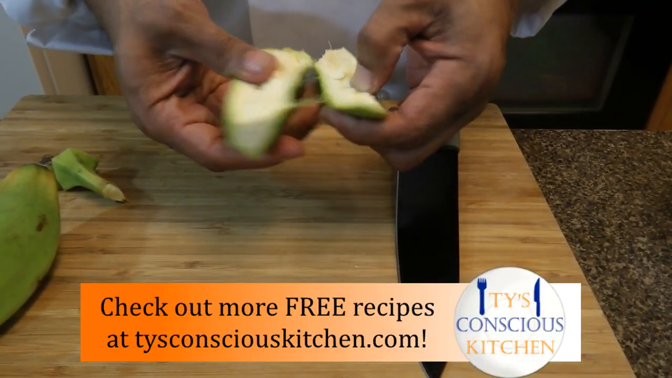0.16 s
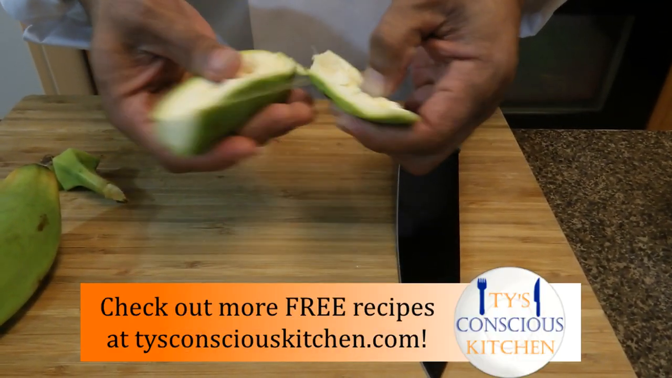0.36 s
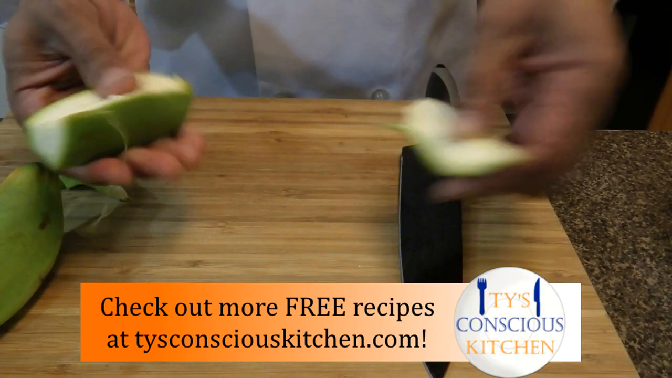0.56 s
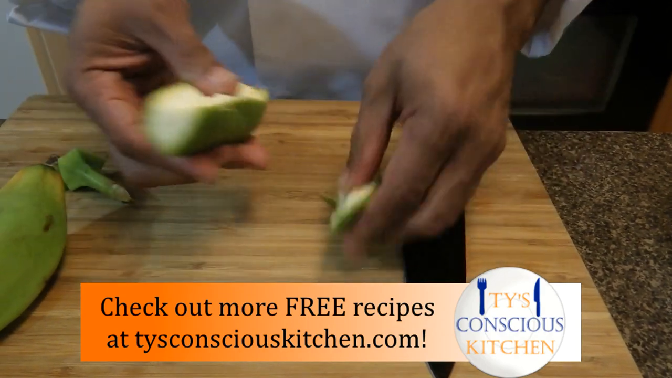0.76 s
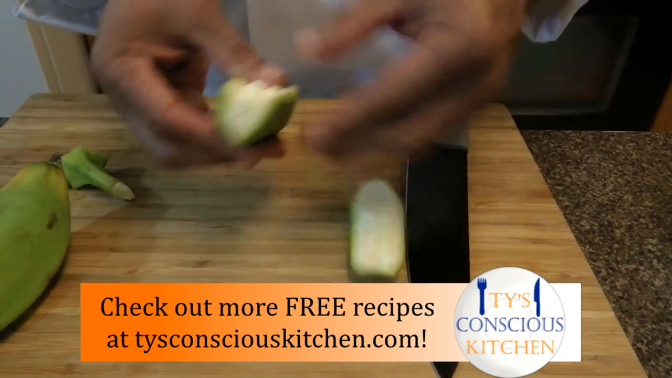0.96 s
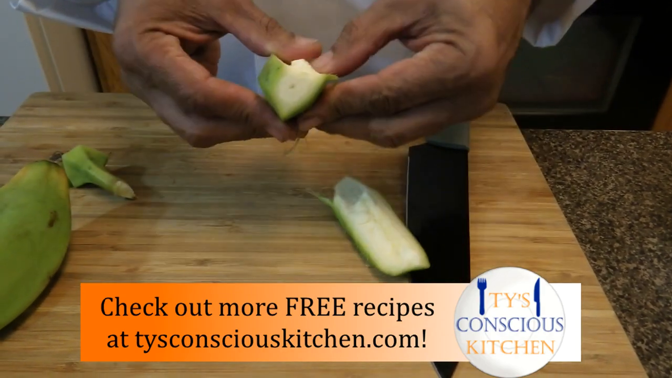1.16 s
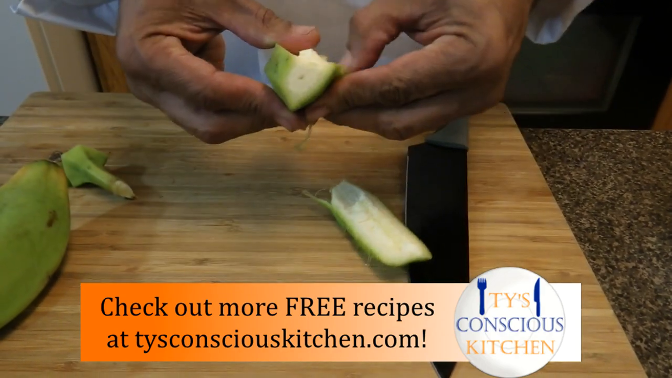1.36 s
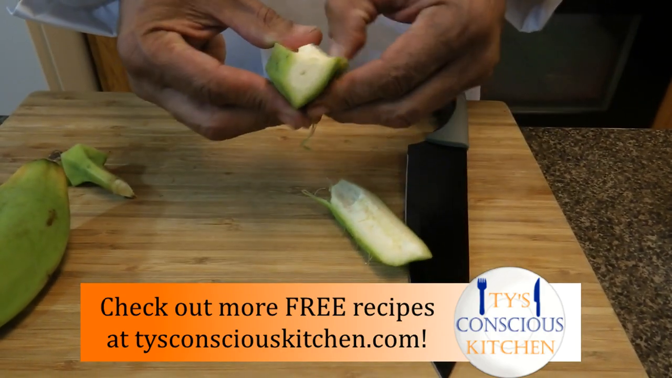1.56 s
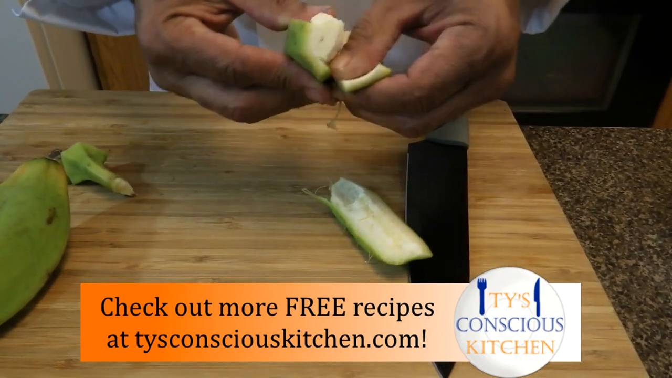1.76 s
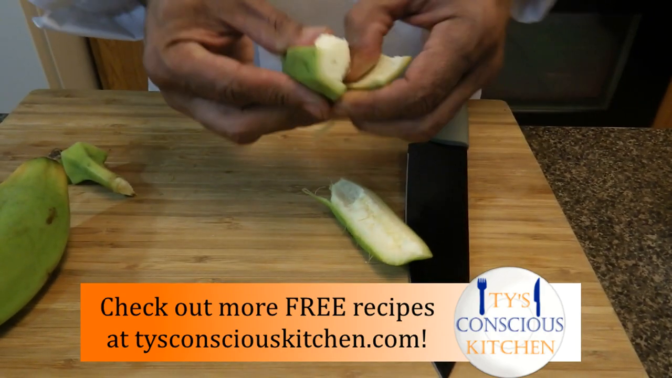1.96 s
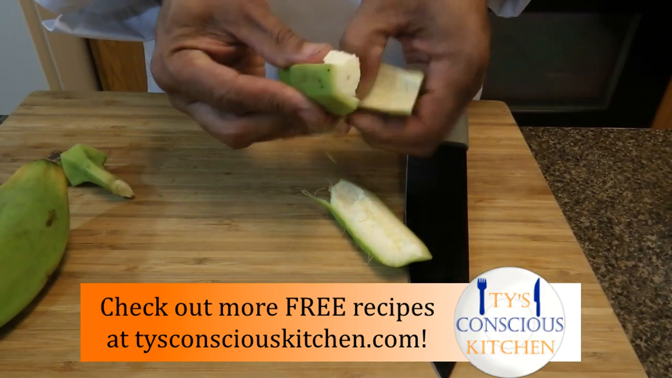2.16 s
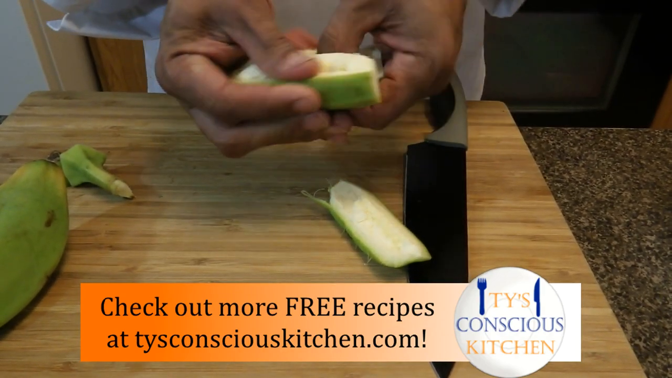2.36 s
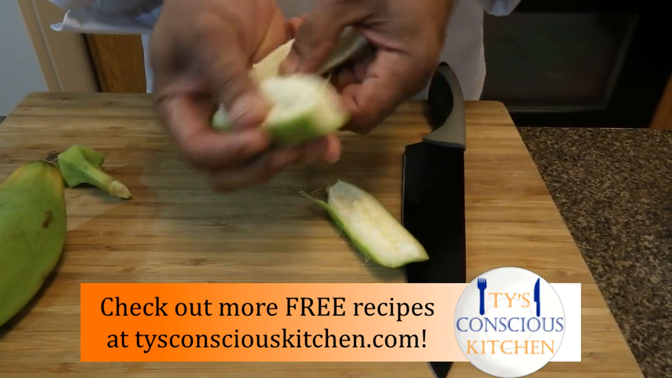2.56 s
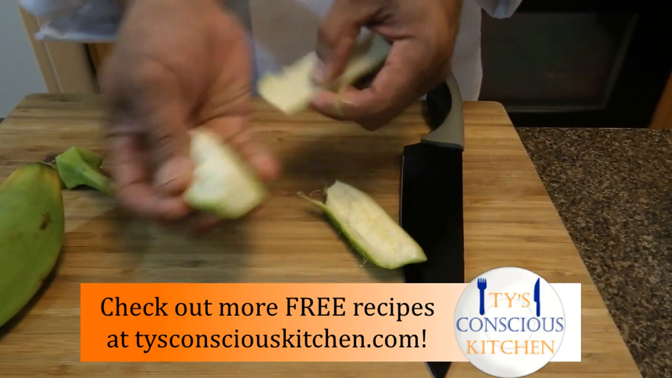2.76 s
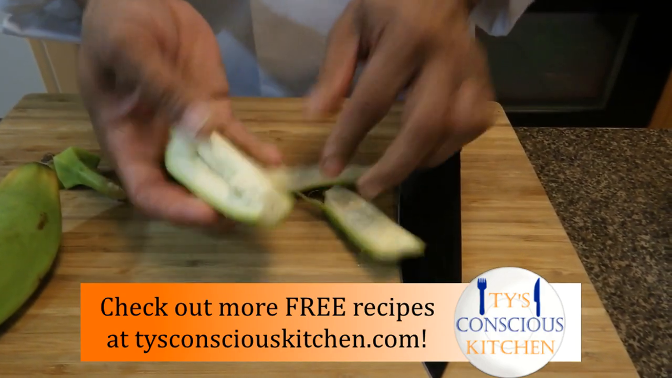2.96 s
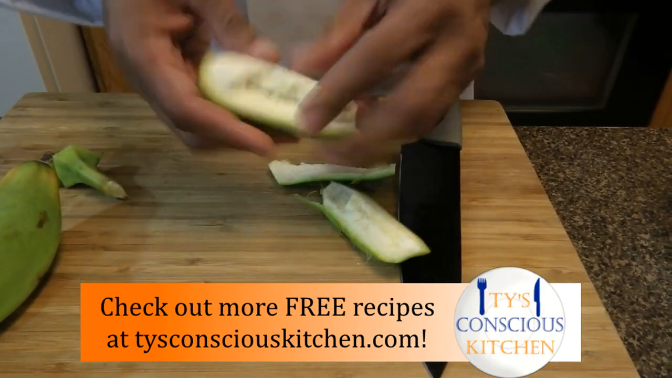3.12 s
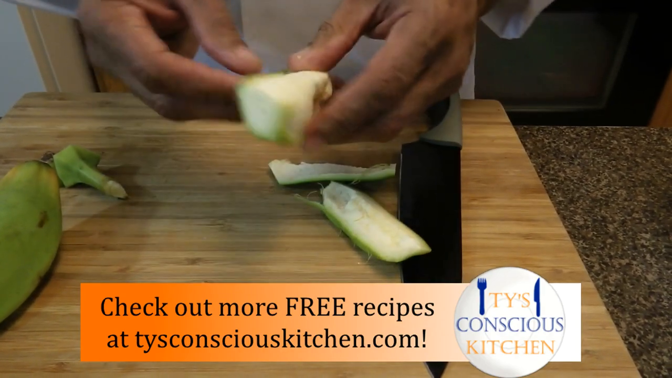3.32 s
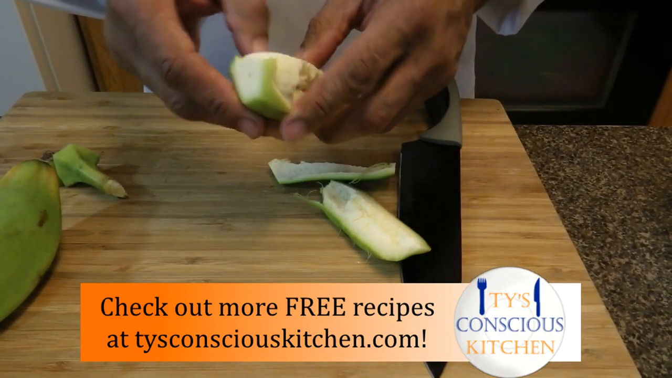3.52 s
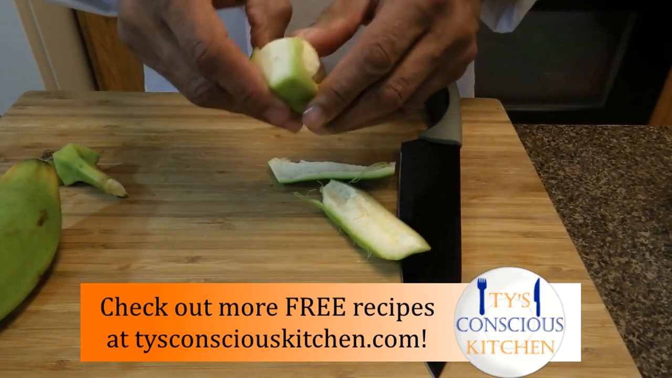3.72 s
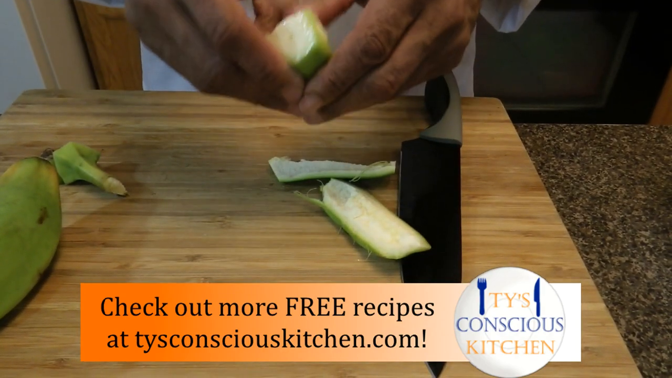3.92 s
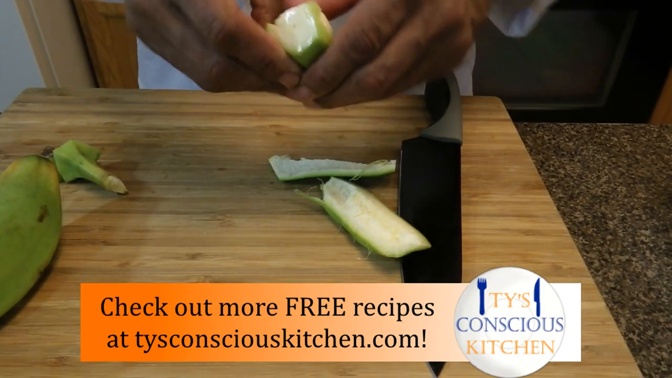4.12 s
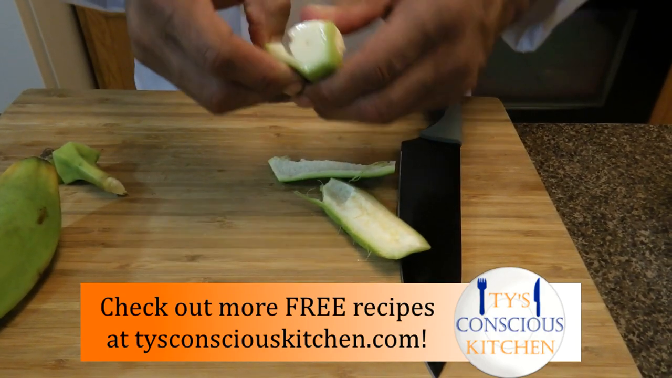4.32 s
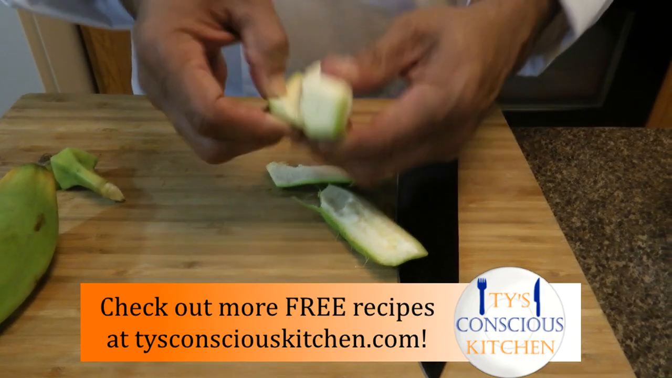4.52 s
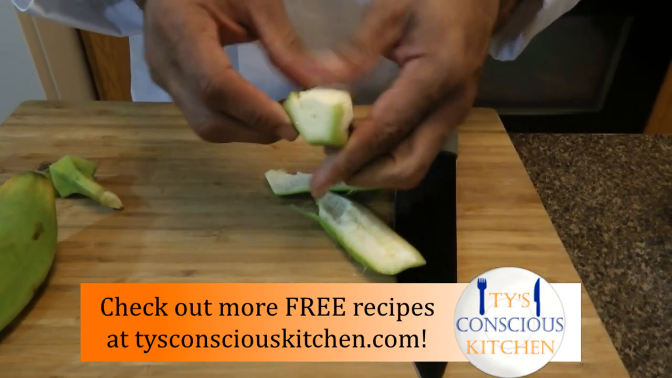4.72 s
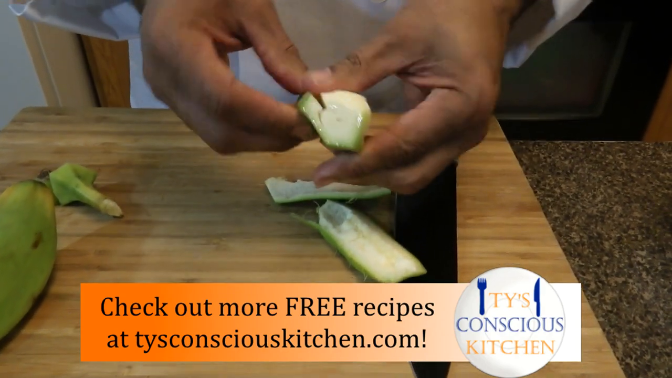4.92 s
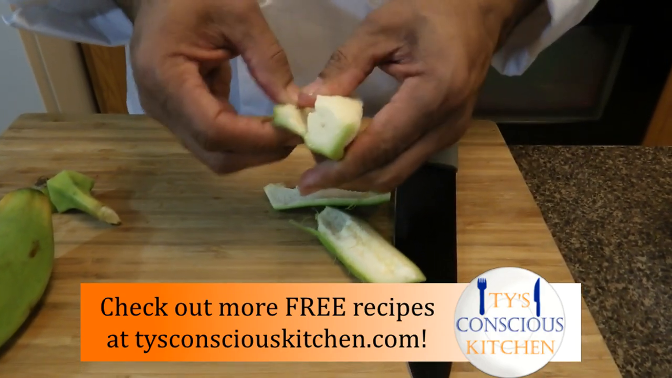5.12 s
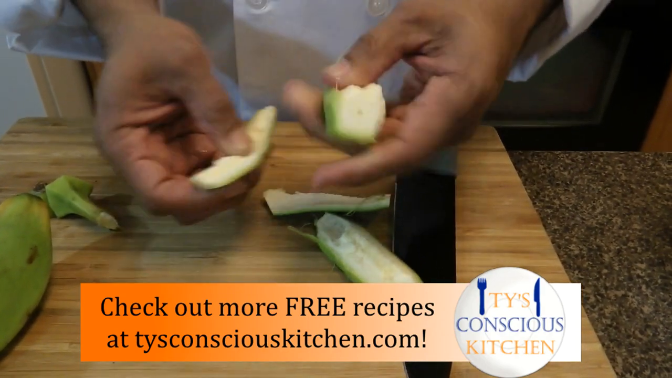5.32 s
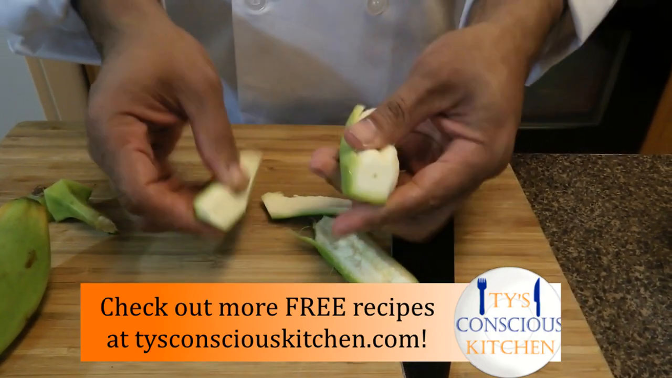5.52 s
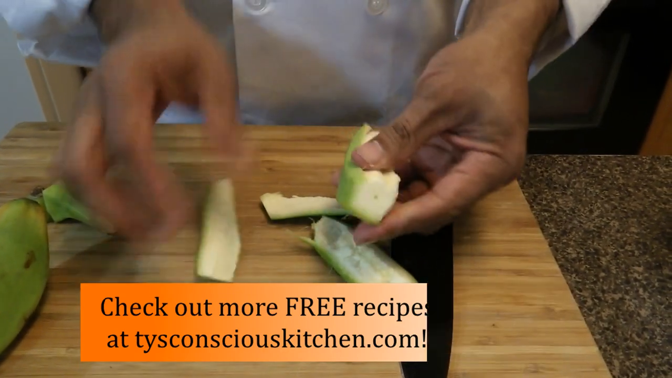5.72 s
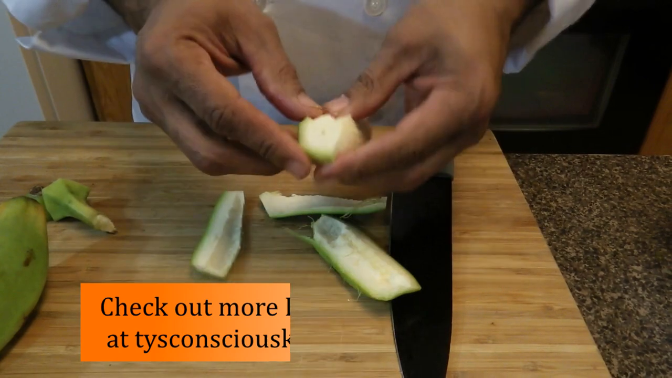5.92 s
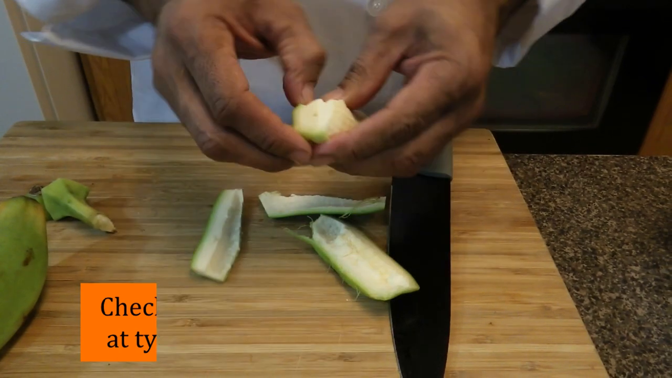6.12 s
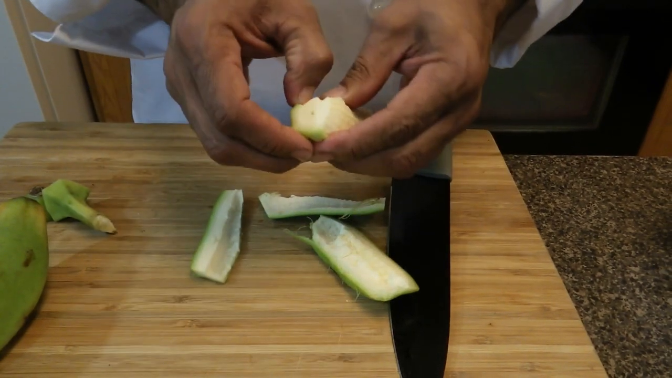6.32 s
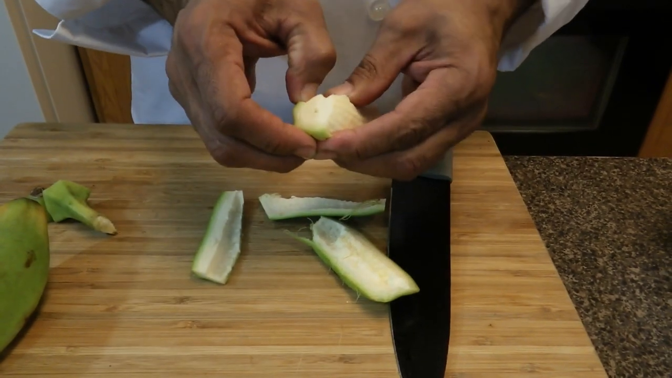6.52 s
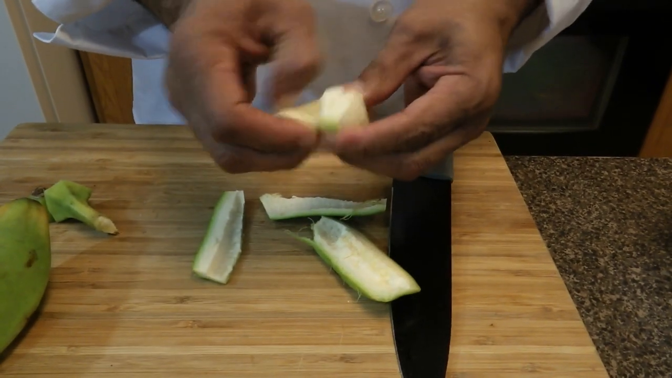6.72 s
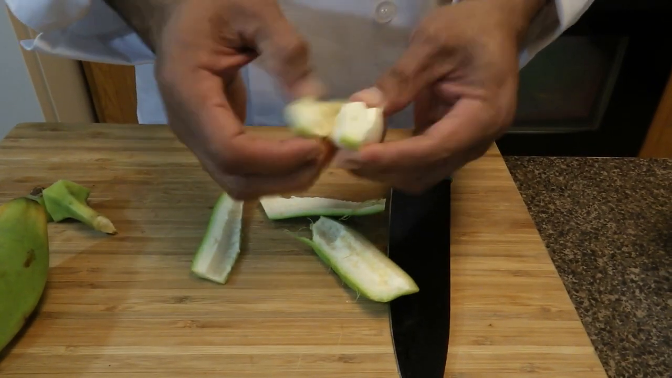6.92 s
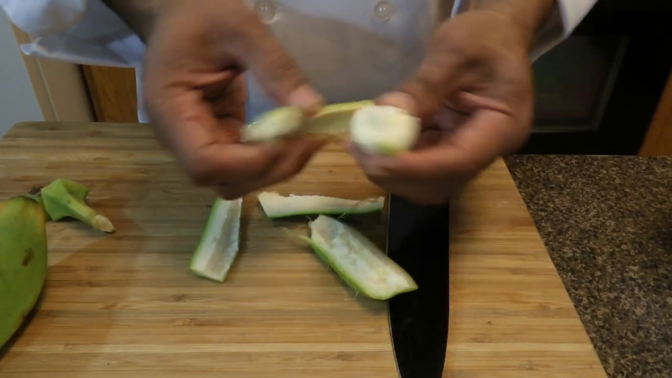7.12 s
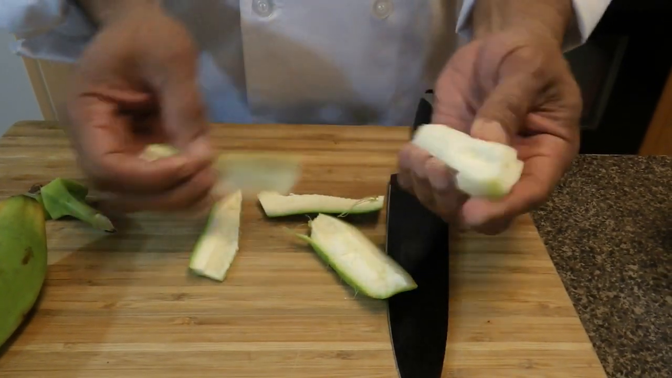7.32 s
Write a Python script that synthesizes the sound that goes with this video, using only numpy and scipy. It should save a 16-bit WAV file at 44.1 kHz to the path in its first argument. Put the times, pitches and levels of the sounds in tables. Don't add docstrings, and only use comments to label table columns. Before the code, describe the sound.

Close, dry fibrous rips and sharp little snaps of tough peel, light knocks on a wooden board, quiet kitchen hum behind.

```python
import sys
import numpy as np
from scipy import signal
from scipy.io import wavfile
from scipy.ndimage import uniform_filter1d

SR = 44100
rng = np.random.default_rng(int(sys.argv[2]) if len(sys.argv) > 2 else 0)


def put_to_file(sound):
    columns = np.atleast_2d(sound).T
    safe = np.clip(columns, -1, 1)
    whole_steps = np.round(safe * 32767)
    wavfile.write(sys.argv[1], SR, whole_steps.astype(np.int16))


def level_to_linear(level):
    exponent = np.asarray(level, float) / 20
    return 10 ** exponent


N = 329684
STEP = 16


def evened(x):
    return x / np.sqrt(np.mean(x ** 2) + 1e-20)


def flutter(smooth_s):
    size = max(round(smooth_s * SR), 2)
    once = uniform_filter1d(rng.standard_normal(N), size)
    return evened(uniform_filter1d(once, size))


def coloured(spectrum, patchy_db):
    frames, hz = N // 256 + 5, np.fft.rfftfreq(1024, 1 / SR)
    real, imaginary, patches = rng.standard_normal((frames, 513, 3)).T
    patches = evened(uniform_filter1d(uniform_filter1d(patches, 14, 0), 8, 1))
    f, db = np.transpose(spectrum)
    shape_db = np.interp(np.log(hz + 1), np.log(f + 1), db, left=-90, right=-90)[:, None]
    bins = (real + 1j * imaginary) * level_to_linear(shape_db + patchy_db * patches)
    return evened(signal.istft(bins, nperseg=1024, noverlap=768)[1][:N])


def ring(hz, t60, size=4000, rise=1.0):
    t = np.arange(size) / SR
    swell = 1 - np.exp(-t * hz / rise)
    return level_to_linear(-60 * t / t60) * np.sin(2 * np.pi * hz * t) * swell


def add(mix, s, sound):
    part = mix[round(s * SR):][:len(sound)]
    part += sound[:len(part)]


def stroke(start, length, rise_db_per_s, fall_db_per_s):
    t = np.arange(0, N, STEP) / SR - start
    flanks_db = rise_db_per_s * np.minimum(t, 0) - fall_db_per_s * np.maximum(t - length, 0)
    return flanks_db, np.clip(t / length, 0, 1)


def level_of(power):
    return np.interp(np.arange(N), np.arange(0, N, STEP), np.sqrt(power))


def rips():
    # lowest f/Hz, highest f/Hz, ring/cycles, density/(cracks per s)
    fibres = [
        (520, 2960, 6.3, 1100),
        (2400, 4760, 4.66, 2500),
        (4560, 9250, 6.1, 7000),
        (8950, 12500, 4.6, 8000),
    ]
    # t/s, upper pitch f/Hz, lower pitch f/Hz
    hollow = [(0.3, 6000, 3200), (0.53, 6660, 3180), (1.48, 7500, 4200), (1.77, 6900, 3920),
              (1.86, 6100, 4200), (2.12, 6000, 3500), (2.44, 6600, 3460), (2.7, 7000, 3300),
              (4.4, 7000, 4000), (4.62, 6660, 3500), (5.17, 6900, 4400), (5.26, 5730, 4000),
              (5.35, 6260, 3220), (6.87, 6700, 4040), (7.27, 7160, 3450), (7.36, 5850, 3280)]
    thick_gain, middle_gain, fine_gain = pulls()
    s, *pitches = np.transpose(hollow)
    upper_hz, lower_hz = (np.interp(np.arange(N) / SR, s, hz) for hz in pitches)
    clumps_db = 7.5 * np.tanh(0.36 * flutter(0.001) + 0.19 * flutter(0.004))
    cups_hz = None, lower_hz, upper_hz, None
    flesh, thick, middle, fine = (cracks(*family, clumps_db, hz) for family, hz in zip(fibres, cups_hz))
    flesh_gain = level_to_linear(-14) * (middle_gain / level_to_linear(-22)) ** 0.097
    return thick_gain * (thick + flesh_gain * flesh) + middle_gain * middle + fine_gain * fine


def pulls():
    # t/s, length/s, pull level/dB, thick fibres relative level/dB, fine fibres relative level/dB
    tugs = [(0.288, 0.043, -28.5, 1.5, -9.5), (0.337, .035, -34, 3, -3), (0.528, 0.033, -29.5, 0.5, -11),
            (1.456, 0.075, -30, -8.5, -8), (1.752, 0.079, -23, -11.5, -10), (1.825, 0.051, -20, -12.5, -10),
            (2.041, 0.079, -34, -9, -3), (2.105, 0.06, -32.5, -9, -10), (2.806, 0.0081, -28, 0.5, -10),
            (4.381, 0.06, -25.5, -12, -9), (4.444, 0.026, -32.5, -6.5, -2), (5.148, .104, -32.5, -10, -4),
            (5.311, 0.062, -19, -4.5, -6), (5.37, 0.014, -18.5, -5, 6), (5.399, 0.027, -29, 0, -4),
            (6.852, 0.063, -19, -5, -1), (7.206, 0.044, -30.5, -2, -2), (7.252, .12, -28.5, -10.5, -2.5)]
    # t/s, length/s, level at the end/dB, thick fibres relative level/dB, fine relative level/dB
    drags = [
        (0.471, 0.065, -38.5, 5.5, 4),
        (2.337, 0.12, -37, -3, -6.5),
        (2.448, 0.056, -43.5, -4, -3),
        (2.597, 0.099, -24, -6.5, -7.5),
        (2.721, 0.047, -37, -9, -3.5),
        (4.188, 0.095, -43, -14, -13),
        (4.507, 0.126, -32.5, -8.5, -5),
        (5.275, 0.047, -27.5, -12, -1),
        (6.837, 0.028, -52, -11, -2),
    ]
    tug_shape = [0, 0.29, 1], [-4, 0, -8]
    drag_shape = [0, 1], [-9.5, 0]
    finer_db = 4
    thick = middle = fine = 0
    strokes = [(row, tug_shape) for row in tugs] + [(row, drag_shape) for row in drags]
    for (s, length, db, thick_db, fine_db), shape in strokes:
        flanks_db, along = stroke(s, length, rise_db_per_s=1800, fall_db_per_s=700)
        creak_db, fray_db = -14, -19.5
        loose_db = stroke(s, length, rise_db_per_s=518, fall_db_per_s=166)[0]
        loose_db = loose_db + np.where(along > 0, fray_db, creak_db)
        power = level_to_linear(2 * (db + np.interp(along, *shape) + np.maximum(flanks_db, loose_db)))
        thick = thick + power * level_to_linear(2 * thick_db)
        middle = middle + power
        fine = fine + power * level_to_linear(2 * (fine_db + finer_db * along))
    return level_of(thick), level_of(middle), level_of(fine)


def cracks(low_hz, high_hz, cycles, per_s, clumps_db, cup_hz=None, count=12):
    size = level_to_linear(2.3 * np.minimum(rng.exponential(1, N), 3.5)) * (rng.random(N) < per_s / SR)
    size *= rng.choice([-1., 1.], N) * level_to_linear(clumps_db)
    kind = rng.integers(0, count, N)
    flap_s, flap_db = 0.06, 1
    bands = rng.standard_normal((N // 512 + 1, count))
    bands = evened(uniform_filter1d(bands, round(flap_s * SR / 512), 0))
    size *= level_to_linear(flap_db * bands)[np.arange(N) // 512, kind]
    pitches = np.geomspace(low_hz, high_hz, count)
    if cup_hz is not None:
        favour = 0.16 + np.exp(-(np.log(pitches[:, None] / cup_hz[::64]) / 0.12) ** 2)
        even_out = 1 / np.sqrt((favour ** 2).mean(0))
        size *= np.repeat(even_out, 64)[:N] * favour[kind, np.arange(N) // 64]
    out = np.zeros(N)
    for k, hz in enumerate(pitches):
        shape = ring(hz, cycles / hz, size=600, rise=1.1)
        out += signal.oaconvolve(size * (kind == k), shape / np.linalg.norm(shape))[:N]
    return evened(out)


def snaps():
    # t/s, peak level/dB, ring f/Hz
    tough_fibres = [(0.028, -12, 3630), (0.1099, -7, 4500), (0.1256, -22, 3100), (0.1407, -24, 7350),
                    (0.212, -13, 6500), (0.2145, -19, 3200), (0.2236, -16, 3140), (0.2551, -17.5, 3100),
                    (0.2714, -17.5, 8610), (1.1177, -24, 3120), (5.076, -29, 9500), (2.3866, -21, 6330),
                    (2.442, -18.5, 7320), (2.732, -20, 5860), (2.7643, -22, 6120), (2.805, -14, 3600),
                    (2.974, -27, 8500), (2.9989, -17, 5760), (4.026, -24, 7580), (4.2513, -25, 7750),
                    (4.2786, -21.5, 6400), (4.3177, -29, 6200), (4.3245, -28, 6550), (4.3549, -19, 6750),
                    (6.338, -29.5, 3330), (7.0309, -25.5, 8400),
                    (0.2915, -6, 5430), (0.2987, -6.5, 3140), (0.306, -12.5, 3030), (0.324, -23, 4050),
              (0.3661, -13, 7040), (0.53, -6, 4780), (0.5518, -10.5, 3950), (1.4605, -38, 4200),
              (1.5235, -31, 7300), (1.8684, -5.5, 6000), (2.176, -19, 6200), (2.6024, -15.5, 6800),
              (2.6804, -9, 5860), (2.7083, -8, 7670), (2.814, -8, 7700), (4.527, -21, 7840),
              (4.5897, -21, 6150), (4.618, -19, 6400), (4.6445, -19.5, 7200), (5.242, -20.5, 5510),
              (5.2827, -17, 5370), (5.313, -4.5, 6600), (5.3774, -2.5, 6100), (5.393, -7, 6240),
              (5.4236, -10.5, 6500), (6.8859, -6, 9300), (7.2112, -13, 4800), (7.246, -16, 3650),
              (7.2637, -19, 8100), (7.35, -15, 5300)]
    events = tough_fibres
    out, t = np.zeros(N), np.arange(300) / SR
    puffs = rng.standard_normal((len(events), 300))
    click = ring(7040, 0.00064, size=300) + 0.39 * ring(10600, 0.0005, size=300)
    for (s, db, hz), puff in zip(events, puffs):
        splinters = 0.31 * puff * level_to_linear(-60 * t / 0.0072)
        splinters[0] = 1
        tock = level_to_linear(-5.0 - 2.8 * hz / 1000) * ring(1380, 0.0036, size=300)
        flap = ring(hz, 3.94 / hz, size=300) + 0.86 * click
        snap = np.convolve(flap, splinters)[:300] + tock
        add(out, s, level_to_linear(db) * snap / abs(snap).max())
    return signal.sosfilt(signal.butter(2, 700, "high", fs=SR, output="sos"), out)


def rubs():
    # t/s, length/s, skin level/dB, palm relative level/dB
    finger_slides = [(0, 0.2, -46.5, -6), (0.371, 0.066, -45.5, 1.5), (0.57, 0.099, -40, -3.5),
                     (0.827, 0.15, -46.5, -1.5), (1.03, 0.075, -55, 1.5), (1.152, 0.015, -50.5, -14),
                     (1.557, 0.035, -56, -5), (1.9, 0.035, -48.5, -3), (2.028, 0.035, -45, -3.5),
                     (2.2, .12, -49.5, -19), (2.528, 0.076, -42.5, -7), (2.768, 0.022, -48, -3),
                     (2.857, 0.083, -37.5, -5), (2.988, 0.27, -44.5, -4), (3.296, 0.1, -47.5, -3.5),
                     (3.485, 0.034, -48.5, -7.5), (3.622, 0.19, -45.5, -6), (3.97, 0.058, -45, -7),
                     (4.09, 0.043, -51, -4.5), (4.694, 0.2, -47, -1.5), (4.975, 0.038, -44, -5.5),
                     (5.094, .05, -48.5, -9), (5.432, 0.12, -50, -0.5), (5.683, 0.075, -48.5, -2.5),
                     (5.82, 0.014, -44, -2), (5.919, .14, -42, -3.5), (6.33, 0.021, -52, -8),
                     (6.962, 0.18, -46.5, -4), (7.415, .1, -36.5, -4)]
    # f/Hz, level/dB per Hz
    skin_spectrum = [(2500, -20), (3500, 0.5), (4800, 1), (6900, 2.5), (9000, -3.5), (13000, -11.5),
                     (15000, -16.5), (16000, -26)]
    # f/Hz, level/dB per Hz
    palm_spectrum = [(500, 1.5), (900, -1.5), (1600, 3), (3000, 2), (4200, -7)]
    slope, rest_db = 240, -60.5
    skin_power, palm_power = level_to_linear(2 * rest_db), 0
    for s, length, db, palm_db in finger_slides:
        slide = level_to_linear(2 * (db + stroke(s, length, slope, slope)[0]))
        skin_power = skin_power + slide
        palm_power = palm_power + slide * level_to_linear(2 * palm_db)
    grain_db = 1.33 * flutter(0.004) + 1.0 * flutter(0.031)
    skin = level_of(skin_power) * coloured(skin_spectrum, patchy_db=2.5)
    palm = level_of(palm_power) * coloured(palm_spectrum, patchy_db=2.5)
    return level_to_linear(grain_db) * (skin + palm)


def knocks():
    # t/s, peak level/dB, low thump relative level/dB, hard edge relative level/dB, ring
    board_knocks = [(0.799, -24, -18, -16, 0.33), (0.869, -29.5, -0.5, -23, 0.73),
                    (1.029, -19.5, -12, -15, 0.41), (1.058, -29, -1, -13, 0.62), (1.119, -19, -7.5, -18, 0.45),
                    (1.21, -31, -14, -12, 0.74), (3.083, -21, -15, -25, 0.45), (3.115, -24.5, -11, -8, 0.66),
                    (3.204, -29, -9, -7.5, 0.53), (5.854, -17.5, -30, -14, 0.69), (5.867, -11.5, -29, -10, 0.5),
                    (5.932, -25, -12, -33, 1), (6.011, -28, -13, -17, 0.97)]
    # f/Hz, level/dB, t60/s
    board = [(837, 3, 0.05), (640, -15, 0.0089), (470, -1.5, 0.078)]
    # f/Hz, level/dB, t60/s
    edge = [(1453, 3.5, 0.03), (1940, -15, 0.022), (2250, -1.5, 0.031), (3110, -2, 0.034),
            (4200, 5, 0.0051), (6000, 1, 0.0046)]
    # f/Hz, level/dB, t60/s
    counter = [(59.3, -17.5, 0.4), (133.5, -2, 0.059), (191, -14, 0.165), (254, -4, 0.058),
               (352, -1, 0.013)]
    out = np.zeros(N)
    spread = rng.uniform(0.866, 1.037, (len(board_knocks), 2))
    shake_decay = level_to_linear(-60 * np.arange(3000) / SR / 0.53)
    shakes = 0.028 * rng.standard_normal((len(board_knocks), 3000)) * shake_decay
    thump = np.zeros(20000)
    for k, (hz, db, t60) in enumerate(counter):
        thump += (-1) ** k * level_to_linear(db) * ring(hz, t60, size=20000, rise=0.21)
    for (s, db, low_db, hard_db, longer), (a, b), shake in zip(board_knocks, spread, shakes):
        soft = sum(level_to_linear(d) * ring(hz * a, t60 * longer) for hz, d, t60 in board)
        hard = sum(level_to_linear(d) * ring(hz * b, t60 * longer) for hz, d, t60 in edge)
        rumble = thump + signal.oaconvolve(thump, shake)[:len(thump)]
        add(out, s, -level_to_linear(db - 12) * soft)
        add(out, s, -level_to_linear(db + hard_db + 3) * hard)
        add(out, s, -level_to_linear(db + low_db - 1.0) * rumble)
    return out


def fridge():
    # f/Hz, level/dB per Hz
    air = [(20, -20), (45, -6), (90, -11.5), (140, 1), (240, -1), (300, -7), (480, -7), (750, -11.5),
           (1660, -16), (2800, -17.5), (5380, -18), (6540, -16.5), (14300, -28.5), (16000, -30)]
    hum_hz = [58.8, 114.7, 119.9, 229.4, 239.9, 293.4, 344.1, 458.8]
    hum_db = [-57.5, -64.5, -59, -71, -62.5, -61.5, -62, -66]
    t = np.arange(N) / SR
    out = level_to_linear(-48) * coloured(air, patchy_db=0.3)
    for hz, db in zip(hum_hz, hum_db):
        gain = np.sqrt(2) * level_to_linear(db + 0.58 * flutter(0.24))
        out = out + gain * np.sin(2 * np.pi * (hz * t + rng.random()))
    return out


def kitchen(x):
    taps, at = np.zeros(SR // 2), np.arange(200, SR // 2 - 20, 20)
    taps[at + rng.integers(0, 20, len(at))] = rng.choice([-1., 1.], len(at))
    hz, t, z = signal.stft(taps, SR, nperseg=256)
    t60 = np.interp(hz, [500, 12000], [0.35, 0.12])[:, None]
    tail = signal.istft(z * level_to_linear(-60 * t / t60), SR, nperseg=256)[1]
    tail = level_to_linear(-13.5) * tail / np.linalg.norm(tail)
    tail[0] = 1
    tail[round(0.0011 * SR)] = 0.3
    return signal.oaconvolve(x, tail)[:N]


def scene():
    return (kitchen(rips() + snaps() + knocks()) + rubs() + fridge())[None]


def band_limit(x):
    return signal.sosfilt(signal.butter(12, 16500, fs=SR, output="sos"), x)


def record(dry):
    start = [level_to_linear(-36.5)]
    power = signal.lfilter([1 / 4000], [1, 1 / 4000 - 1], dry[0] ** 2, zi=start)[0]
    recovery_db = np.arange(N) * 13.3 / SR
    held_db = np.maximum.accumulate(10 * np.log10(power + 1e-12) + recovery_db) - recovery_db
    over_db = np.maximum(held_db + 26, 0)
    ducked = dry / level_to_linear(0.74 * uniform_filter1d(over_db, 800))
    low_pass = signal.firwin(255, 15750, window=("kaiser", 9), fs=SR)
    return band_limit(signal.oaconvolve(ducked, low_pass[None], "same"))


dry = scene()
out = record(dry)
put_to_file(out)
```